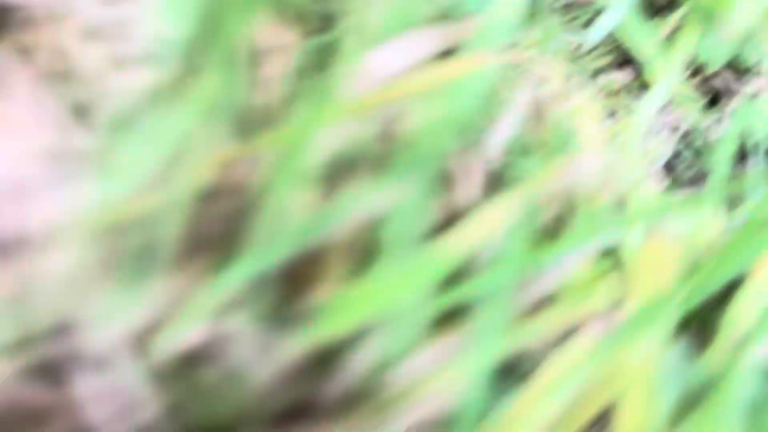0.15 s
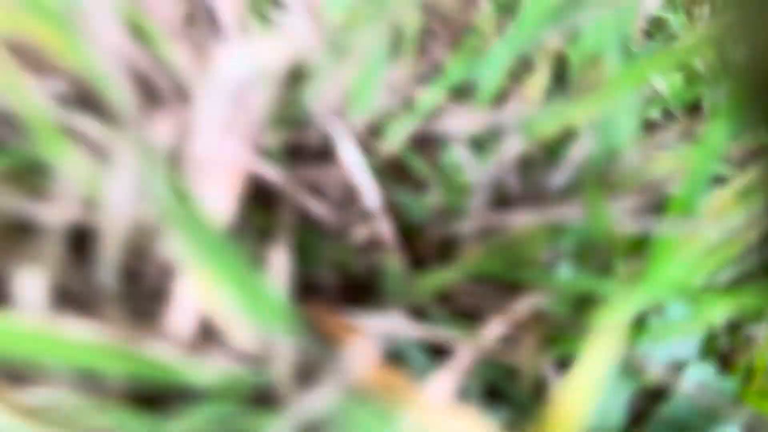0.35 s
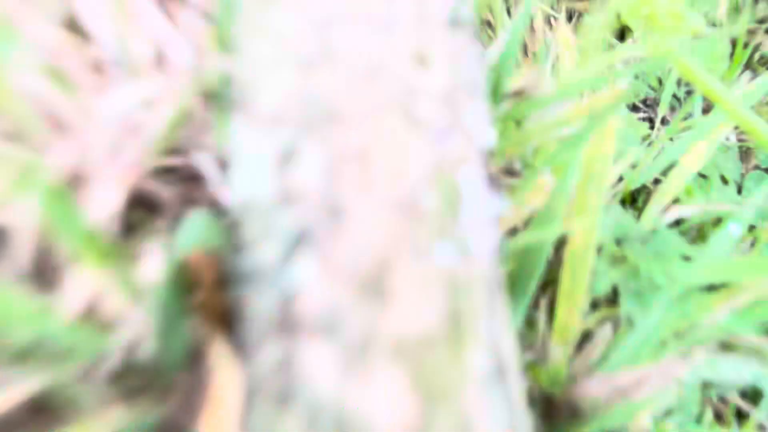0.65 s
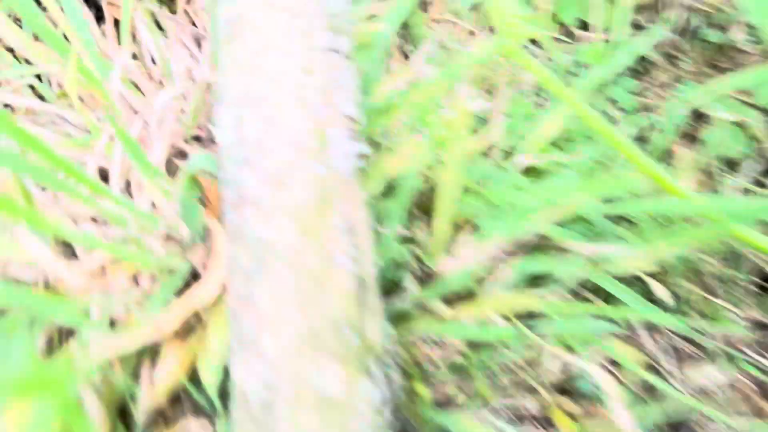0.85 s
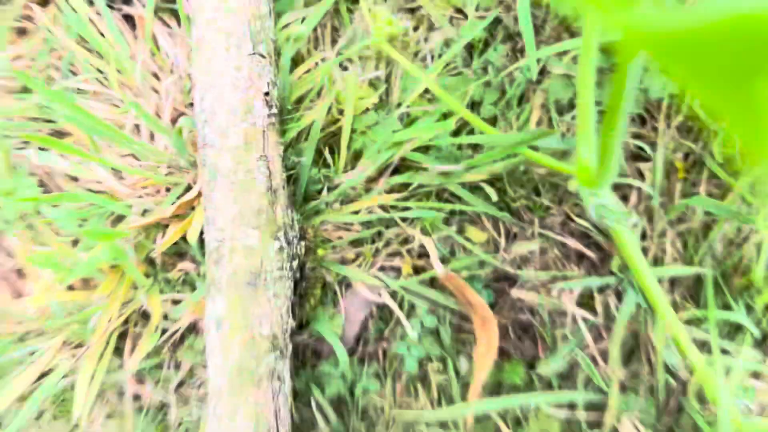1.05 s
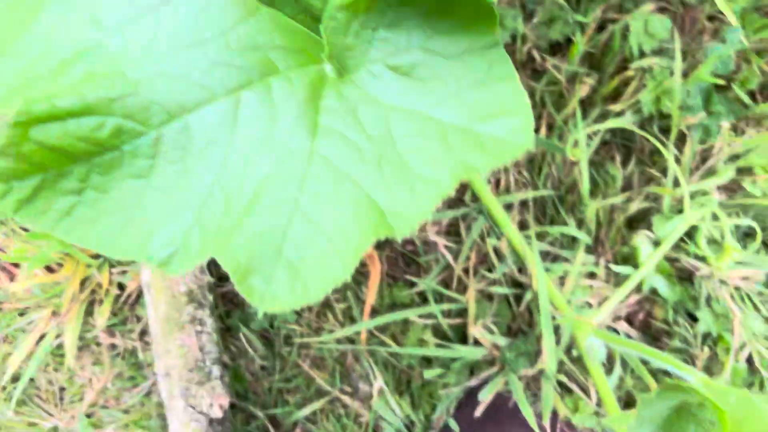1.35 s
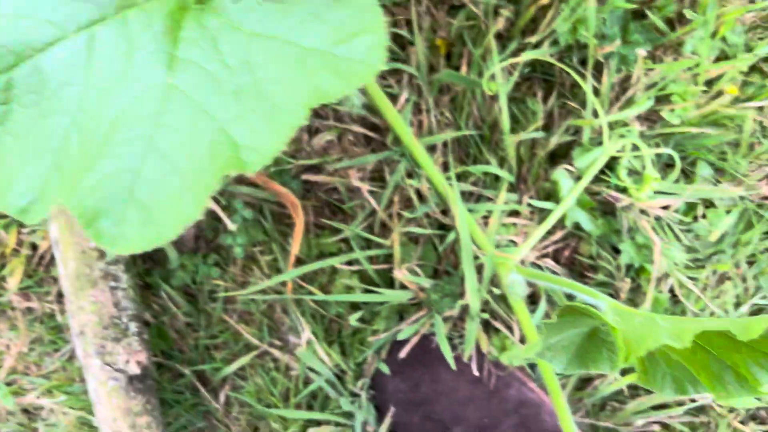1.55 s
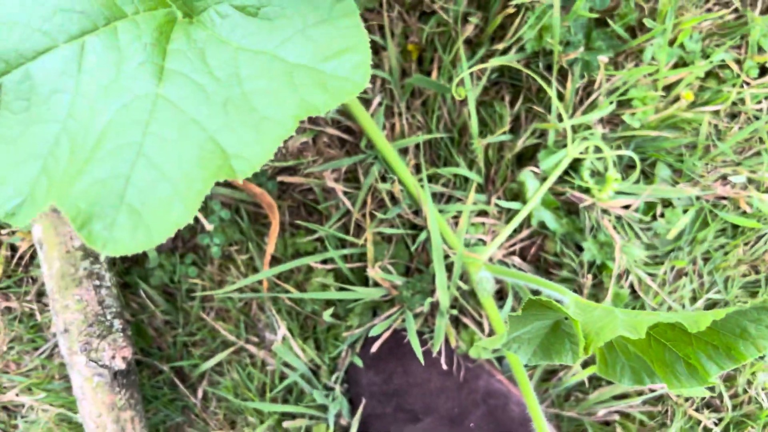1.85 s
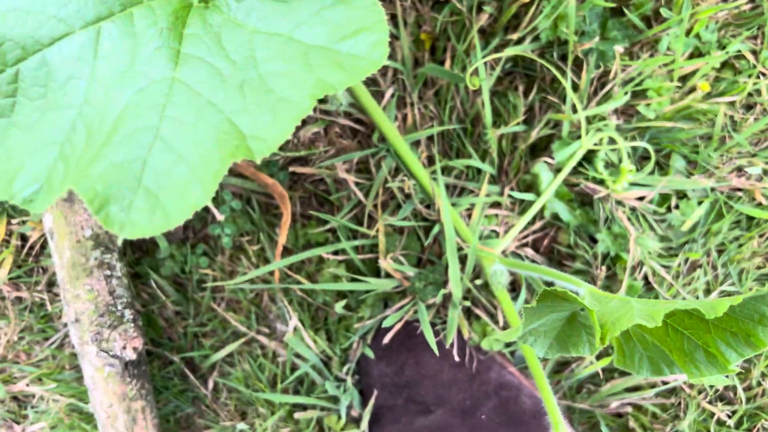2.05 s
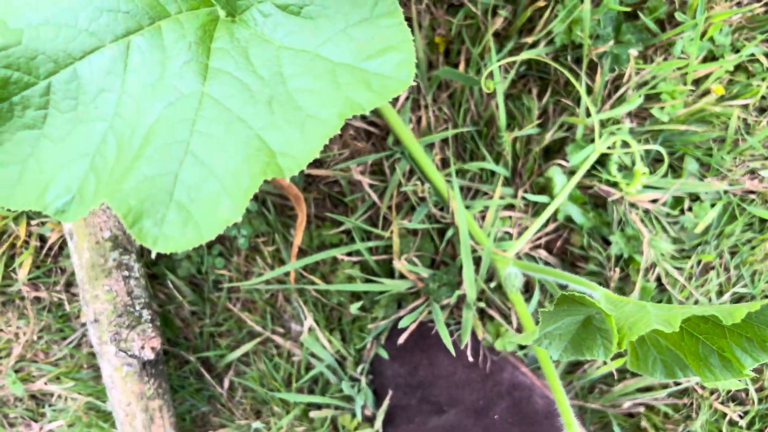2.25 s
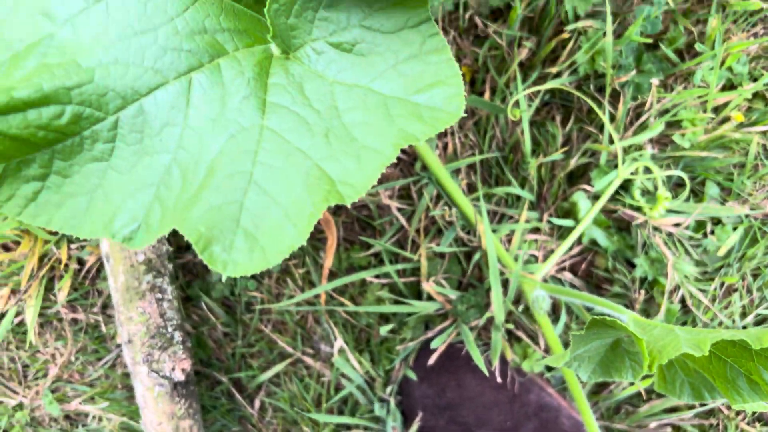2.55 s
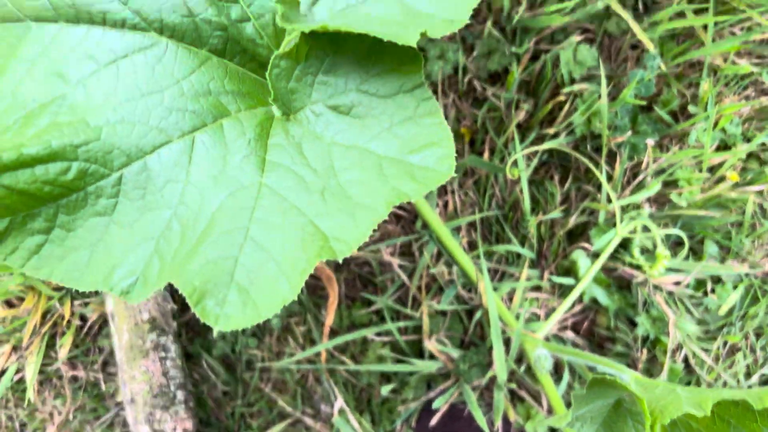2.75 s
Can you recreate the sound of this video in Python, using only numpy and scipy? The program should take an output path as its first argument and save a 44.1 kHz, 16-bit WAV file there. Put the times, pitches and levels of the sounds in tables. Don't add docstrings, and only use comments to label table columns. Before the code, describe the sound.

Grass and leaves brush very close, loudest in the first 0.7 seconds, over low handling rumble. A dry snap comes at 0.13, a jerky, hollow scrape on the case at 0.2-0.35, and bright crackling snaps at 0.45-0.65. Softer leafy swishes continue to about 1.7, shifting sides. Then near quiet with tiny stem ticks, denser after 2.2, and a faint rustle returning near 2.7-3.

```python
import sys
import numpy as np
from scipy import signal
from scipy.fft import rfft, irfft, next_fast_len
from scipy.io import wavfile
from scipy.ndimage import uniform_filter1d, map_coordinates

SR = 44100
rng = np.random.default_rng(int(sys.argv[2]) if len(sys.argv) > 2 else 0)


def gain_from_db(level_db):
    decades = np.asarray(level_db, float) / 20
    return 10 ** decades


def transcribe(u):
    v = np.clip(np.atleast_2d(u).T, -1, 1)
    q = np.round(v * 32767).astype(np.int16)
    wavfile.write(sys.argv[1], SR, q)


N = 127890


def unit(x):
    return x / np.sqrt(np.mean(x ** 2) + 1e-20)


def steady(x, span_s):
    return x / np.sqrt(np.abs(uniform_filter1d(x ** 2, round(span_s * SR))) + 1e-20)


def along(points, hz):
    f, v = np.transpose(points)
    return np.interp(np.log(hz + 1), np.log(f + 1), v)


def closed(points):
    below, above = (points[0][0] / 3, -60), (points[-1][0] * 1.5, -60)
    return lambda hz: gain_from_db(along([below] + list(points) + [above], hz))


def wobble(rate):
    knots = rng.standard_normal(int(N * rate / SR) + 4)
    return map_coordinates(knots, [np.arange(N) * rate / SR])


def filtered(x, response):
    m = next_fast_len(N + 8192)
    return irfft(rfft(x, m) * response(np.fft.rfftfreq(m, 1 / SR)), m)[..., :N]


def patchy(patch_db):
    z = signal.stft(rng.standard_normal(N + 512), nperseg=256)[2]
    field = uniform_filter1d(rng.standard_normal(z.shape), 8, 0)
    field = uniform_filter1d(field, 8, 1)
    return unit(signal.istft(z * gain_from_db(patch_db * unit(field)), nperseg=256)[1][:N])


def crackle(per_s, scatter_db, life_s):
    size_db = scatter_db * np.minimum(rng.exponential(1, N), 3)
    starts = (rng.random(N) < per_s / SR) * gain_from_db(size_db)
    t = np.arange(400) / SR
    envelope = signal.fftconvolve(starts, gain_from_db(-60 * t / life_s))[:N]
    return unit(envelope * rng.standard_normal(N))


def strokes(rows, extra_db=0):
    rise_db, fall_db_per_s = 14, 900
    start, rise, end, db = np.transpose(rows)[:4, :, None]
    t = np.arange(N) / SR
    climb_db = -rise_db * np.clip((start + rise - t) / rise, 0, 9) ** 1.72
    stop_db = -fall_db_per_s * np.clip(t - end, 0, 1)
    return np.sqrt(np.sum(gain_from_db(db + extra_db + climb_db + stop_db) ** 2, axis=0))


def ports(x, pan_db, turn, spread=1):
    # frequency in Hz, lag between the ports in half turns.
    lag_points = [(0, 0), (1100, 1), (2300, 2), (4700, 3), (7450, 4), (9500, 5), (11900, 6), (14450, 7),
                  (15650, 8), (16100, 9)]
    # frequency in Hz, share of the sound unrelated between the ports.
    loose_share = [(250, 0.087), (900, 0.106), (2200, 0.65), (5500, 1), (7200, 0.0065)]
    # frequency in Hz, share of the left-right level difference.
    case_shadow = [(330, 0.14), (700, 1.54), (2500, 0.76), (5000, 2), (6900, 0.64)]
    f, half_turns = np.transpose(lag_points)
    sides = np.array([[1], [-1]])

    def lag(hz):
        h = np.interp(hz, f, half_turns)
        stepped = h - np.sin(2 * np.pi * h) / (2 * np.pi) * (h > 3)
        return np.exp(.5j * np.pi * turn * stepped * sides)

    def loose(hz):
        return np.clip(spread * along(loose_share, hz), 0, .6)

    z = signal.stft(x, nperseg=128)[2]
    scrambled = z * np.exp(2j * np.pi * rng.random((2,) + z.shape))
    blur = signal.istft(scrambled, nperseg=128)[1][:, :N] * 1.3
    pair = filtered(x, lambda hz: np.sqrt(1 - loose(hz)) * lag(hz))
    pair = pair + filtered(blur, lambda hz: np.sqrt(loose(hz)))
    shaded = filtered(pair, lambda hz: np.clip(along(case_shadow, hz), 0, 1.5))
    return pair + shaded * (gain_from_db(.5 * sides * pan_db) - 1)


def garden():
    # frequency in Hz, density in dB per Hz.
    hush = [(40, -5), (105, 1.5), (300, -10), (900, -15), (1900, -14.5), (5000, -22.5), (9500, -31),
            (15500, -20.5)]
    air = unit(filtered(patchy(patch_db=2.5), closed(hush)))
    return ports(gain_from_db(-73.5) * air, pan_db=-1.5, turn=1)


def shake():
    # start in seconds, rise in seconds, end in seconds, level in dB.
    grip_moves = [(-.02, 0.016, 0.039, -37), (.07, 0.038, 0.16, -36.5), (.16, 0.018, 0.19, -42.5),
                  (.21, 0.063, 0.34, -36), (.33, .01, 0.38, -50), (.36, .02, 0.43, -47),
                  (.43, 0.024, 0.54, -47.5), (.56, 0.011, 0.74, -56.5), (.61, 0.022, 0.66, -49.5),
                  (.68, 0.043, 0.95, -55), (.82, 0.059, .92, -44.5), (.92, 0.0084, 0.98, -46.5),
                  (.99, 0.0094, 1.19, -50.5), (1.2, 0.027, 1.44, -66), (1.33, .02, 1.41, -65.5),
                  (1.45, 0.036, 1.6, -61.5), (1.58, 0.023, 1.665, -62.5), (1.69, .02, 1.735, -63.5),
                  (1.74, .02, 1.88, -73.5), (1.92, .03, 2.03, -64), (2.05, .02, 2.32, -72),
                  (2.3, 0.088, 3, -67.5), (2.52, 0.021, 2.5, -54), (2.59, 0.03, 2.2, -65),
                  (2.67, 0.02, 2.82, -66), (2.75, .02, 3.4, -70.5)]
    # frequency in Hz, density in dB per Hz.
    rumble = [(25, -26.5), (60, -2), (100, 1.5), (170, -4), (300, -10.5), (600, -20), (1000, -26.5)]
    still_db, still_hz = -58, 150
    lumps = filtered(rng.standard_normal((2, N)) * gain_from_db(2 * wobble(60)), closed(rumble))
    dull = filtered(lumps, lambda hz: 1 / (1 + (hz / still_hz) ** 4))
    gain = strokes(grip_moves)
    force = np.clip(gain / gain_from_db(still_db), .2, 1)
    mid, side = steady(dull + (lumps - dull) * force, span_s=.045) * gain
    return mid + 0.11 * np.array([side, -side])


def swish(rows, pan_db, turn):
    # frequency in Hz, density in dB per Hz.
    leaf_body = [(250, -1), (500, -5.5), (1000, -3), (2100, -3), (3500, -10), (6000, -9.5)]
    # frequency in Hz, density in dB per Hz.
    dry_fizz = [(3500, -9), (6000, -13.5), (8000, -13.5), (10000, -14), (12000, -11.5), (14500, -13),
                (16000, -20.5)]

    def rub():
        return patchy(patch_db=3) + 0.49 * crackle(per_s=300, scatter_db=3.5, life_s=0.006)

    clump_db = .3 * wobble(9) + 1.1 * wobble(35)
    body = filtered(rub(), closed(leaf_body))
    fizz = filtered(rub(), closed(dry_fizz)) * gain_from_db(0.53 * wobble(13))
    brightness_db = np.array(rows)[:, 4:]
    brushed = body * strokes(rows) + fizz * strokes(rows, brightness_db)
    return ports(gain_from_db(4.5 + clump_db) * brushed / body.std(), pan_db, turn)


def legs():
    # start in seconds, rise in seconds, end in seconds, level in dB, brightness in dB.
    right_brushes = [(-.02, 0.018, 0.2, -54.5, -0.5), (.16, 0.04, 0.27, -49, -5.5),
                     (.245, 0.013, 0.32, -47, -5), (.33, 0.01, .43, -58.5, -2),
                     (.43, 0.0603, 0.53, -51, -9), (.545, .01, .84, -66.5, 5.5),
                     (.8, 0.12, 1.008, -56.5, 1), (1.9, 0.038, 2.14, -75.5, -2),
                     (2.16, 0.01, 2.24, -73.5, 1.5), (2.42, 0.12, 2.57, -71, -3.5),
                     (2.57, 0.038, 2.62, -76, -3.5), (2.66, 0.035, 2.67, -66, -2),
                     (2.69, 0.066, 2.86, -68, 5), (2.8, 0.065, 3.04, -62.5, -1.5)]
    # start in seconds, rise in seconds, end in seconds, level in dB, brightness in dB.
    left_brushes = [(.97, .05, 1.165, -58, 0.5), (1.15, 0.011, 1.28, -66, -3),
                    (1.22, 0.068, 1.414, -58.5, -3), (1.4, 0.0087, 1.688, -64, -2),
                    (1.7, .01, 1.75, -73, -4), (1.76, .01, 1.93, -74.5, -4), (2.25, 0.083, 3, -75, -1.5)]
    return swish(right_brushes, pan_db=-5.5, turn=-1) + swish(left_brushes, pan_db=-0.5, turn=1)


def bright(x, spread):
    # frequency in Hz, density in dB per Hz.
    papery = [(1000, -8), (4000, -12.5), (8000, -1.5), (10000, -1), (12000, 2.5), (14000, -2.5),
              (16000, -7.5)]
    gain = closed(papery)
    overall = np.sqrt(np.mean(gain(np.linspace(0, SR / 2, 500)) ** 2))
    return ports(filtered(x, gain) / overall, pan_db=-0.57, turn=-1, spread=spread)


def blades():
    # time in seconds, peak in dB, length in ms.
    snaps = [(0.0217, -35, 3.2), (0.1126, -33, 2.6), (0.1266, -22.5, 1.7), (0.492, -17.5, 1.8),
             (0.524, -18, 2.6), (0.541, -21, 2.6), (0.546, -31, 3), (0.6293, -30, 2.4), (0.6424, -19, 1.26),
             (0.7599, -55, 2.2), (1.687, -37.5, 2.2), (1.766, -52, 2.3), (1.7835, -38.5, 2.4),
             (2.1167, -36, 4.6), (1.936, -46.5, 1.1), (1.952, -53, 1.5), (2.1395, -50, 2),
             (2.177, -51.5, 3), (2.183, -53, 2), (2.2058, -59, 1), (2.2142, -46.5, 1.8), (2.413, -57, 2.2),
             (2.4718, -44.5, 2.48), (2.7303, -46, 1.4)]
    dry, t = np.zeros(N), np.arange(600) / SR
    for (s, db, ms), puff in zip(snaps, rng.standard_normal((len(snaps), 600))):
        u = t / (ms / 3000 + 1e-5)
        dry[round(s * SR):][:600] += gain_from_db(db - 8) * u * np.exp(1 - u) * puff
    return bright(dry, spread=14)


def stems():
    # time in seconds, peak in dB, pitch in Hz.
    ticks = [(.1615, -42, 5620), (0.188, -36.5, 5650), (0.2339, -35, 6100), (0.4542, -38, 1920),
             (0.604, -44.5, 5340), (.1266, -36, 4400), (0.6429, -42, 1580), (1.413, -49, 2050),
             (1.5944, -54.5, 2080), (1.7838, -62, 2200), (1.936, -50.5, 1816), (1.9342, -55, 4538),
             (1.95, -52, 4800), (1.9563, -53, 1780), (2.117, -52, 1326), (2.177, -57, 3950),
             (2.1835, -56, 2680), (2.215, -54.5, 1880), (2.2223, -54, 3160), (2.2319, -49.5, 1756),
             (2.2808, -44.5, 3350), (2.363, -55, 1840), (2.3632, -46.5, 5100), (2.4133, -58.5, 1800),
             (2.4483, -53, 3100), (2.4717, -49, 1900), (2.485, -54, 1800), (2.533, -45.5, 2170),
             (2.5396, -45, 2330), (2.558, -50.5, 1950), (2.559, -54.5, 3700), (2.6422, -56, 1860),
             (2.6713, -48, 2620), (2.6756, -53, 2820), (2.687, -49, 3740), (2.693, -49, 5100),
             (2.7316, -65, 2180), (2.8403, -52, 2030), (2.8601, -47, 2070), (2.861, -47, 3100),
             (2.885, -51, 2300)]
    # time in seconds, peak in dB, pitch in Hz.
    knocks = [(.4556, -46, 500), (1.48, -55, 603), (1.502, -57, 800), (1.595, -54, 900), (1.597, -54, 430),
              (1.655, -56, 1000), (1.668, -57, 700), (1.682, -57, 1000), (1.695, -57, 900),
              (1.719, -57, 950), (1.754, -58, 982), (1.936, -54, 630), (2.186, -59, 450), (2.233, -52, 430),
              (2.234, -57, 800), (2.363, -59, 900), (2.365, -55, 412), (2.537, -55, 684)]
    tick_t60_s, knock_cycles = .011, 6
    high, low, t = np.zeros(N + 2000), np.zeros(N + 2000), np.arange(2000) / SR
    for (s, db, hz), draw in zip(ticks, rng.standard_normal((len(ticks), 2, 2000))):
        rough = uniform_filter1d(draw[0], size=30) * 5
        puff = 0.2 * uniform_filter1d(draw[1], size=3)
        ring = np.sin(2 * np.pi * hz * t + 0.74 * rough) + puff
        envelope = (1 - np.exp(-t * SR / 10)) * gain_from_db(-60 * t / tick_t60_s)
        high[round(s * SR):][:2000] += gain_from_db(db + 2.5) * envelope * ring
    for s, db, hz in knocks:
        envelope = (1 - np.exp(-3 * t * hz)) * gain_from_db(-60 * t * hz / knock_cycles)
        low[round(s * SR):][:2000] += gain_from_db(db + 8.5) * envelope * np.sin(2 * np.pi * hz * t)
    return ports(high[:N], pan_db=-4, turn=-1, spread=.25) + low[:N] * gain_from_db([[-1.5], [1.5]])


def foliage(x):
    t = np.arange(SR // 8) / SR
    tail = rng.standard_normal((2, len(t))) * gain_from_db(-60 * t / .03)
    tail = tail / np.linalg.norm(tail[0])
    return x + gain_from_db(-15) * signal.fftconvolve(x, tail, axes=1)[:, :N]


def scrape():
    # start in seconds, rise in seconds, end in seconds, level in dB.
    drags = [
        (.205, 0.031, .25, -32.5),
        (.252, 0.003, 0.28, -35.5),
        (.266, 0.004, 0.305, -22),
        (.316, .005, 0.35, -43.5),
    ]
    # resonance in Hz, width in Hz, level in dB.
    case_modes = [(610, 130, -1), (380, 90, -6), (774, 180, -4.5), (1170, 530, -14.5), (1973, 310, -49)]
    slips_per_s, scatter_db = 615, 1.2
    turns = np.cumsum(slips_per_s / SR * gain_from_db(1.1 * wobble(200)))
    slip_db = scatter_db * (wobble(171.4) + rng.standard_normal(N))
    slips = np.diff(np.floor(turns), prepend=0) * gain_from_db(slip_db)
    drive = unit(slips - slips.mean()) + .6 * rng.standard_normal(N)

    def case(f):
        total = 0
        for k, (center, width, db) in enumerate(case_modes):
            mode = 1j * f * width / (center * center - f * f + 1j * f * width)
            total = total + (-1) ** k * gain_from_db(db) * mode
        return total

    ring = steady(filtered(drive, case), span_s=.012)
    return ports(ring * strokes(drags), pan_db=-6, turn=-1, spread=.3)


def whip():
    # start in seconds, rise in seconds, end in seconds, level in dB.
    passes = [
        (.435, 0.026, 0.53, -46.5),
        (.475, .012, 0.515, -37),
        (.518, .006, 0.52, -48.5),
        (.62, .008, 0.62, -48.5),
    ]
    rustle = patchy(patch_db=5.5) + .6 * crackle(per_s=1600, scatter_db=13.5, life_s=0.0028)
    return bright(gain_from_db(-1.0) * strokes(passes) * unit(rustle), spread=4.5)


def scene():
    near = foliage(blades() + stems())
    return garden() + shake() + legs() + near + scrape() + whip()


def thrifty(x):
    weaker_db = np.array([6, 10])[:, None, None]
    paired_hz = 6500
    hz, _, z = signal.stft(np.array([x[0] + x[1], x[0] - x[1]]) / 2, SR, nperseg=1024)
    strength = uniform_filter1d(np.abs(z) ** 2, size=16, axis=1)
    strength = uniform_filter1d(strength, size=3, axis=2)[:, np.arange(513) // 8 * 8]
    margin_db = weaker_db + 6 * uniform_filter1d(rng.standard_normal(z.shape[2]), size=4)
    keep = (strength > strength[::-1] * gain_from_db(-2 * margin_db)) | (hz < paired_hz)[:, None]
    treble = np.sum(np.abs(z[:, hz > paired_hz]) ** 2, axis=(0, 1))
    earlier = np.minimum(np.roll(treble, 1), np.roll(treble, 2))
    keep = keep | (treble > 3.3 * earlier)
    mid, side = signal.istft(z * keep, nperseg=1024)[1][:, :N]
    return np.array([mid + side, mid - side])


def top_cut(x):
    return signal.sosfilt(signal.butter(12, 16440, fs=SR, output="sos"), x)


def record(dry):
    limited = filtered(dry, lambda hz: np.where(hz < 15850, 1, .12))
    mix = thrifty(limited)
    return top_cut(mix)


dry = scene()
out = record(dry)
transcribe(out)
```